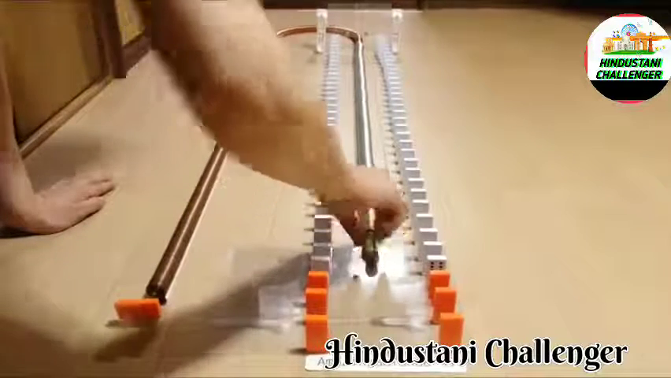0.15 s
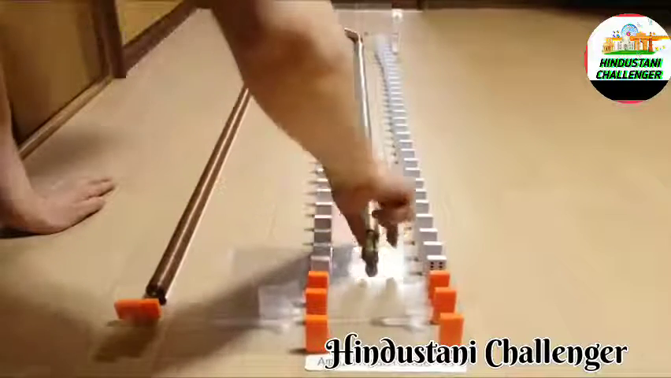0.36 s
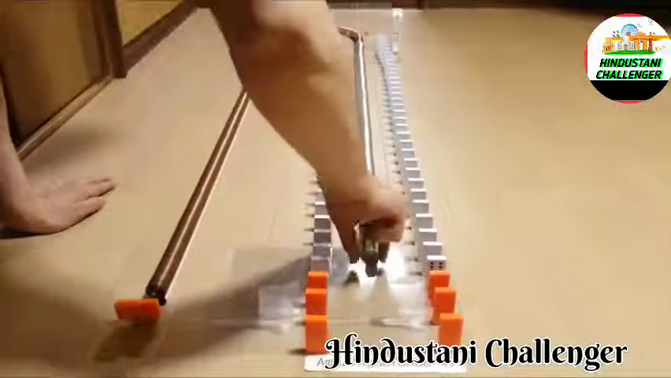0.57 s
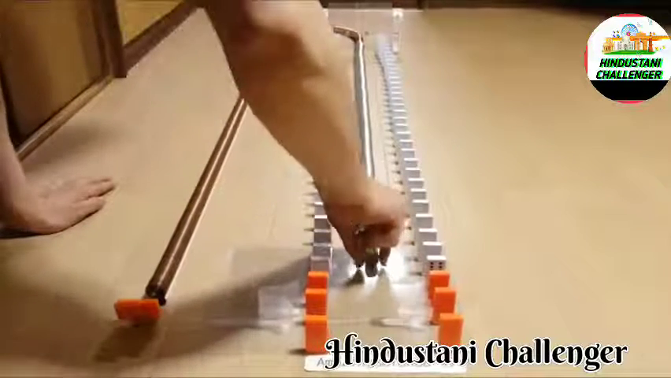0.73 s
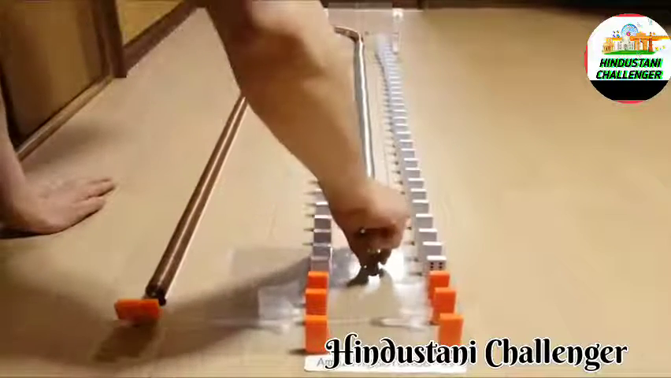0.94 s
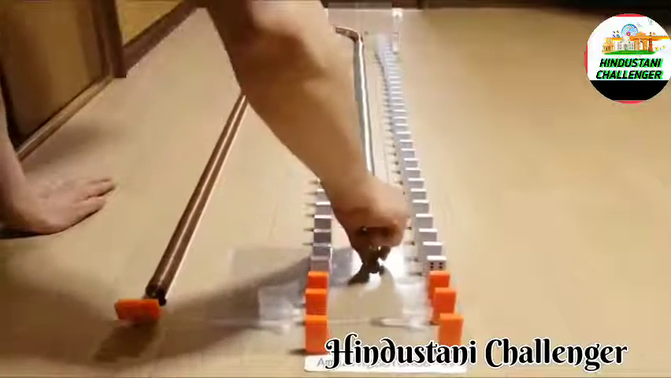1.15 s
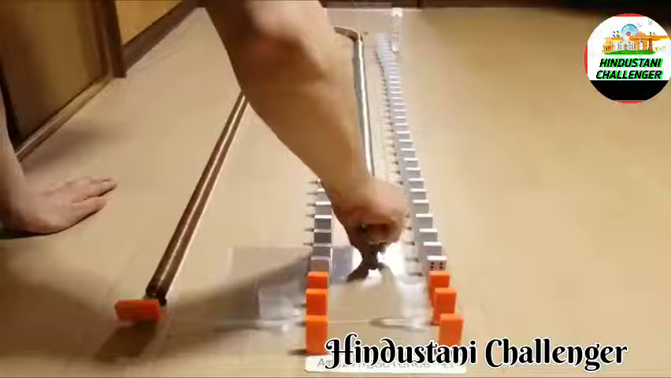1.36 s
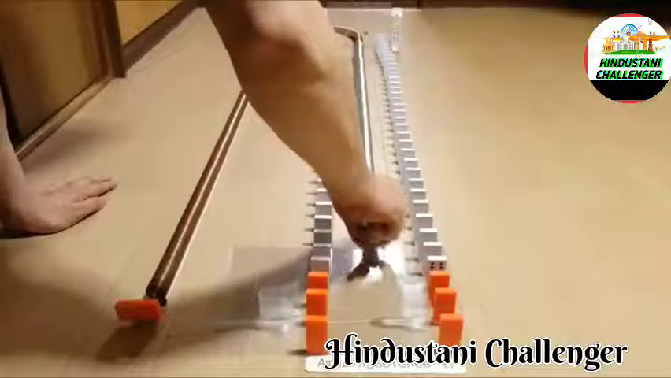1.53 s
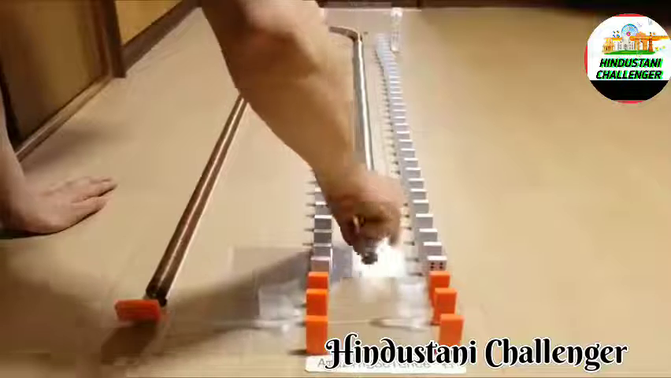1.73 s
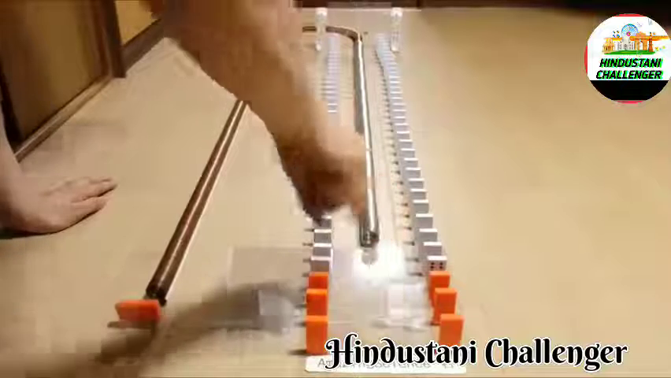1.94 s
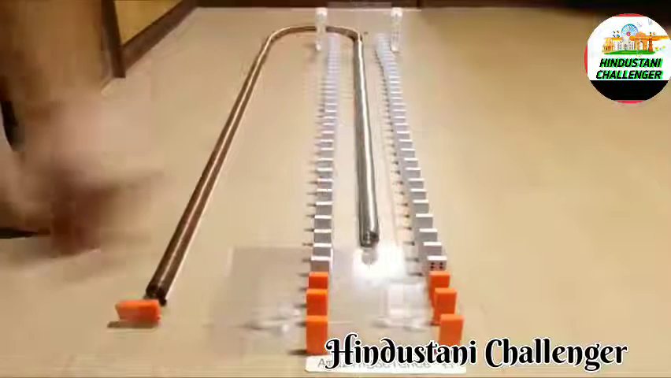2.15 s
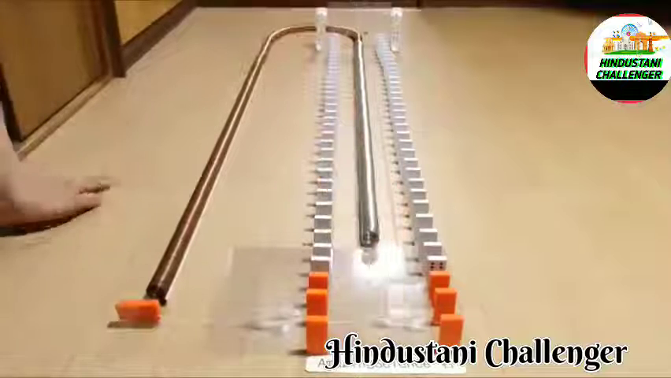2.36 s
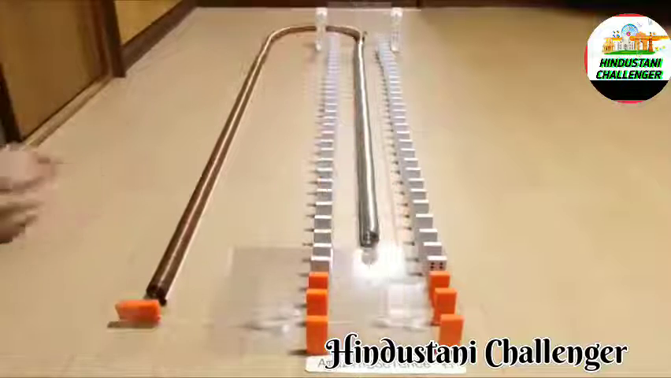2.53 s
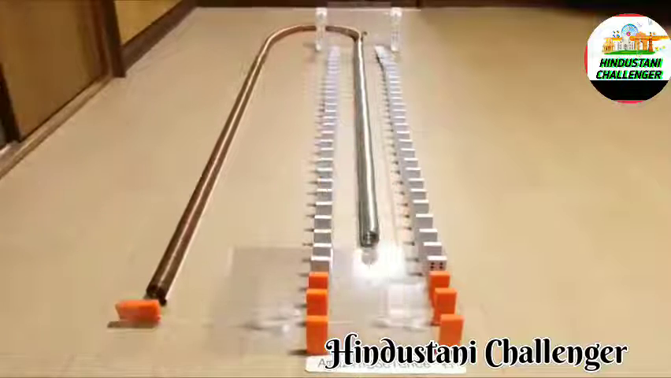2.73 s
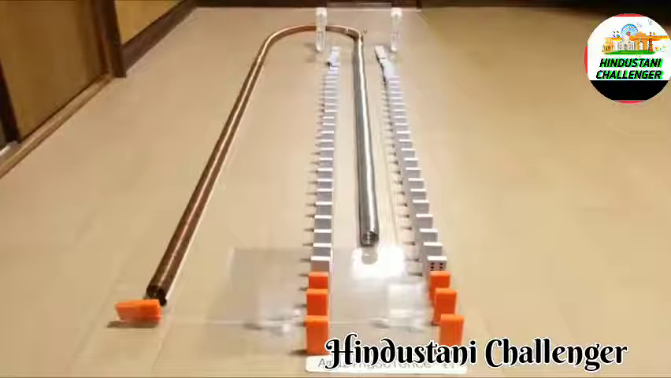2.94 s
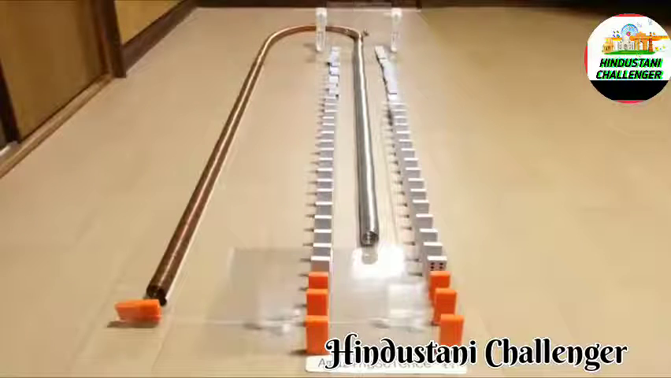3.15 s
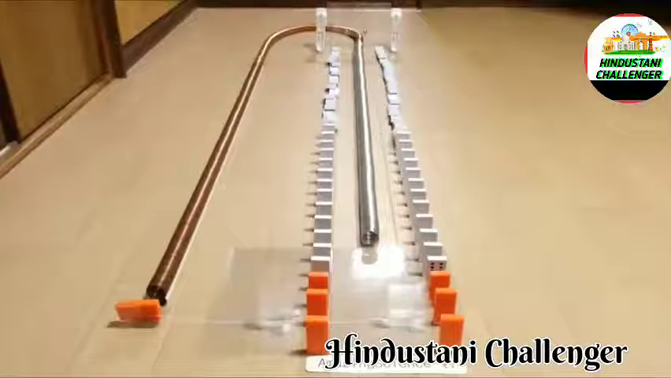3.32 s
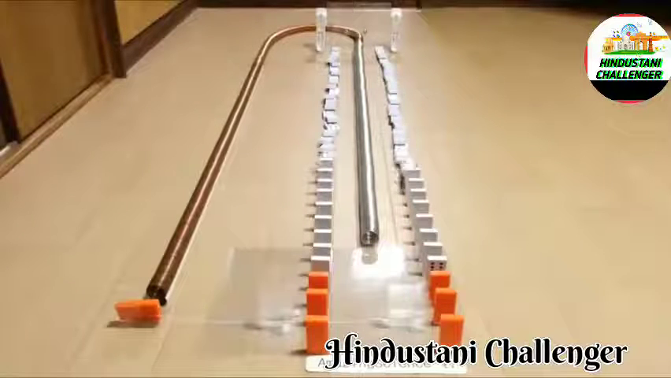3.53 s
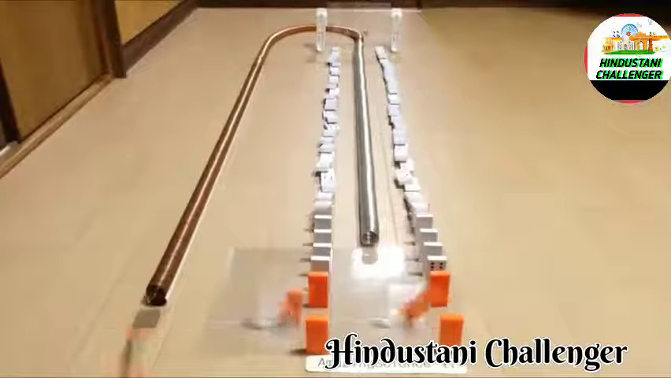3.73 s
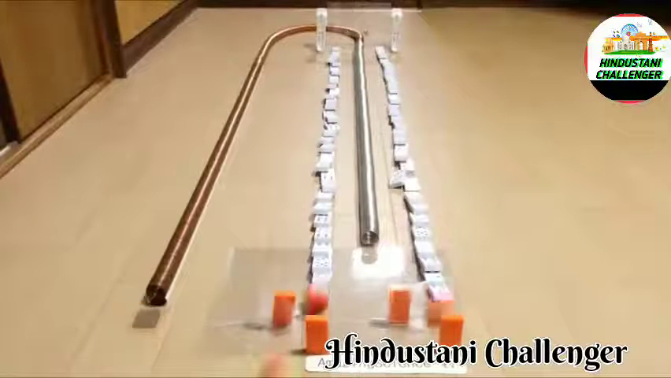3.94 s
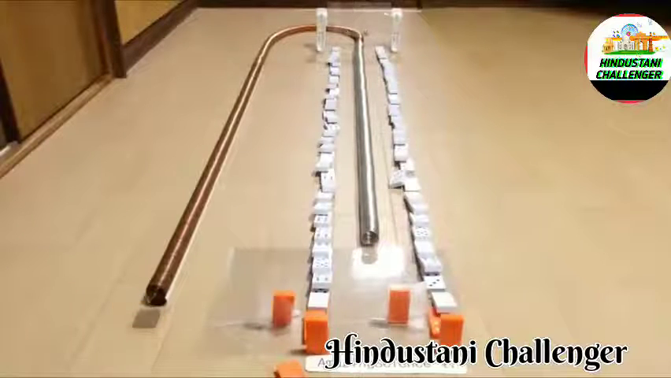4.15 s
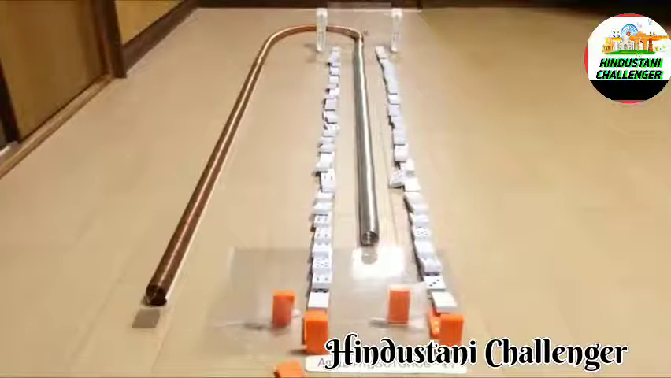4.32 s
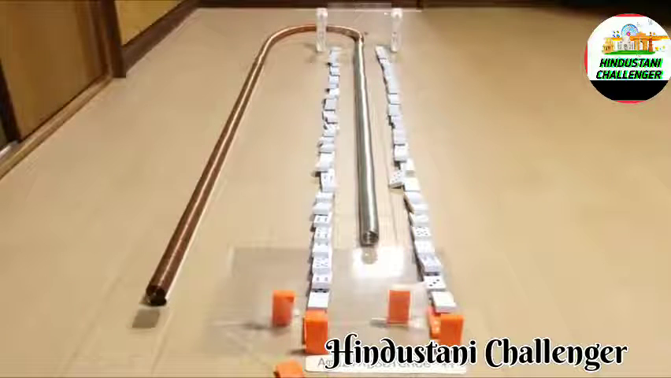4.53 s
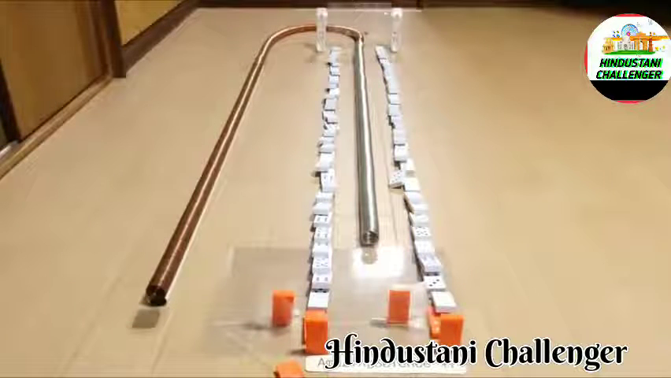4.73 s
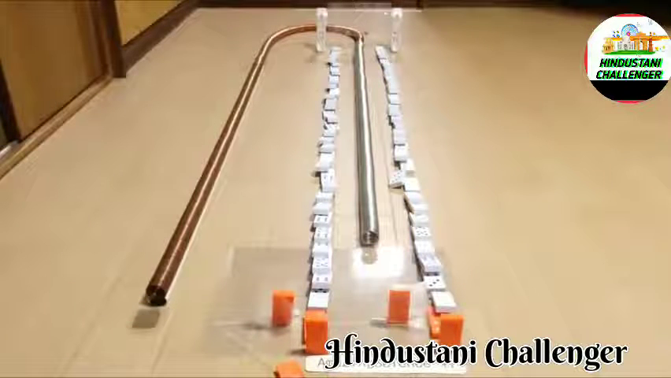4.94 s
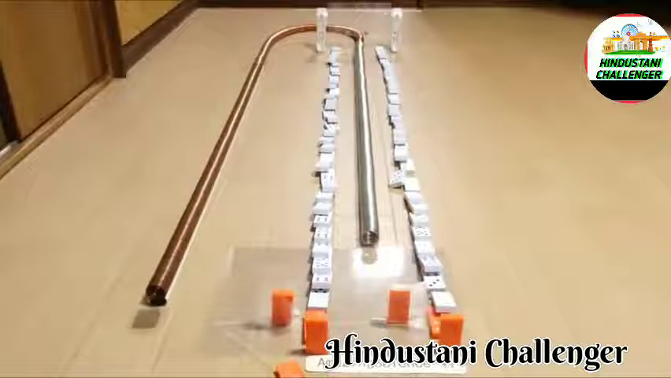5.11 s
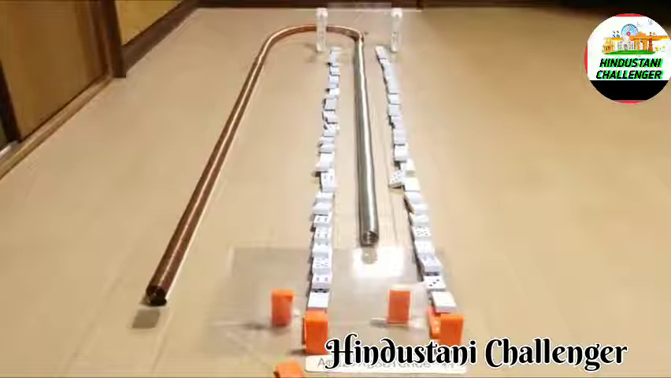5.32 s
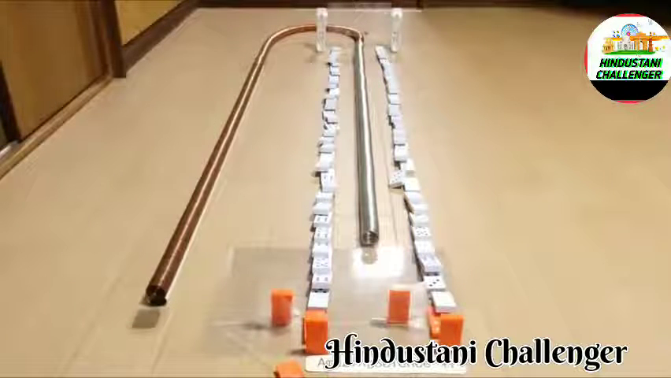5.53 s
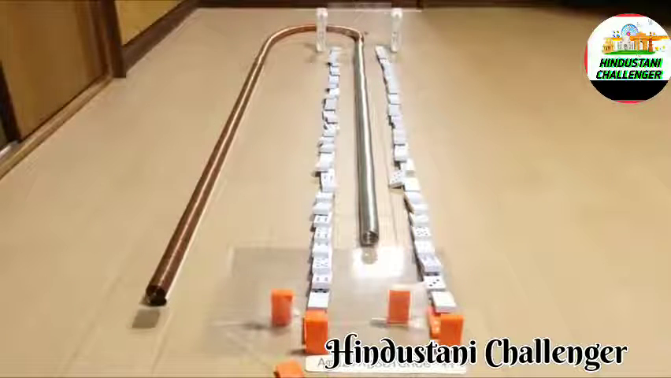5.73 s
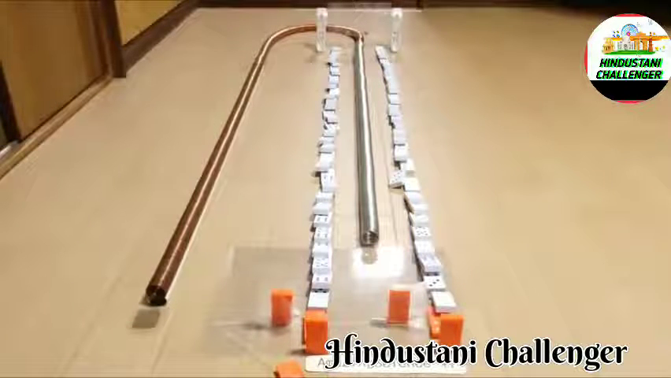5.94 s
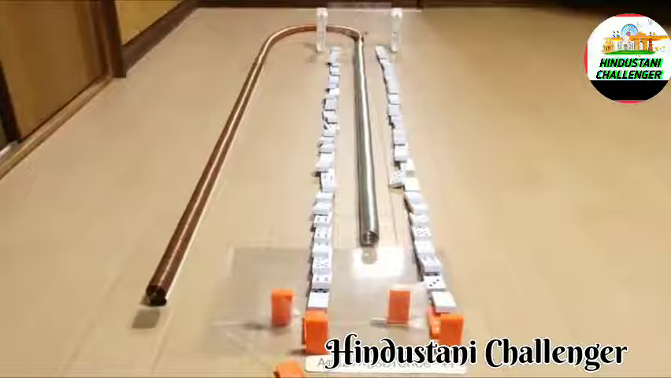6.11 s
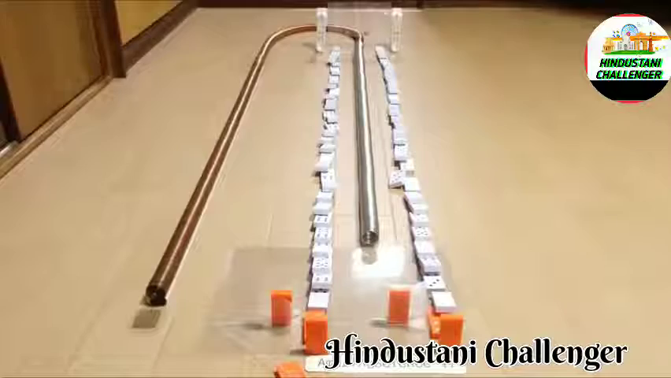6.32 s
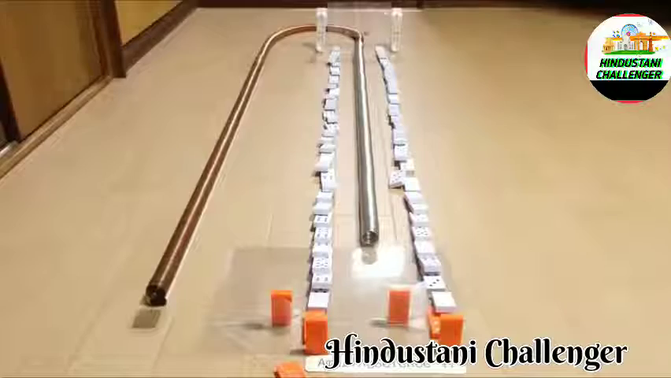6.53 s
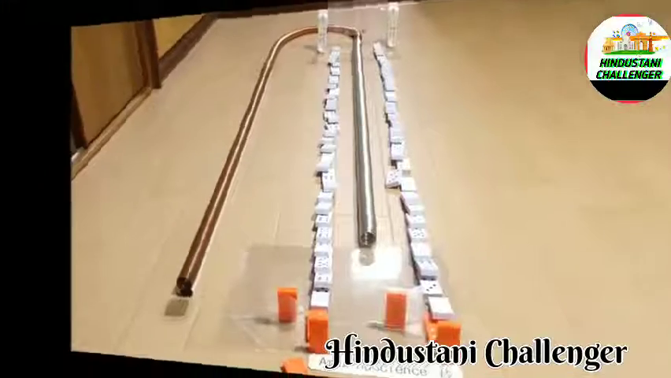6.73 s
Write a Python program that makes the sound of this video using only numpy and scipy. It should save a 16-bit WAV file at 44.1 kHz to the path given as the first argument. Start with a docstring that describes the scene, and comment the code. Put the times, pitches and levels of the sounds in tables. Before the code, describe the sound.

A steel ball rattles through metal pipes, then two rows of dominoes clatter densely on a wooden floor, stop dead, and a plastic block bounces.

```python
"""Two rows of dominoes clatter on a wooden floor: noise cracks, edge snaps and damped sines, then settling.
A steel ball trips them: filtered ticks roll down a steel pipe, rattle round a bend and run on in copper.
Boards drum, a plastic block bounces, and dull blows and soft pushes ring the floor.
Hiss and rumble fill the room; the recorder's gain control ducks under the din, so the hiss vanishes
and creeps back."""
import sys
import numpy as np
from scipy import signal
from scipy.fft import rfft, irfft, next_fast_len
from scipy.io import wavfile
from scipy.ndimage import uniform_filter1d, map_coordinates

SR = 44100
rng = np.random.default_rng(int(sys.argv[2]) if len(sys.argv) > 2 else 0)


def unload_audio(sound):
    """Save the sound as a 16-bit wav file, at the path given as the first command line argument."""
    columns = np.transpose(np.atleast_2d(sound))
    # keep every value between -1 and 1, then stretch to whole-number steps
    steps = np.round(np.clip(columns, -1, 1) * 32767)
    wavfile.write(sys.argv[1], SR, steps.astype(np.int16))


N = 298557
TIME = np.arange(N) / SR
LOUD_DB = 18  # drive of the run, and the most the gain control can cut
# ball: enters steel, strikes bend, calms down, enters copper, drops out
STEEL_S, BEND_S, CALM_S, COPPER_S, EXIT_S = 1.976, 2.423, 2.558, 2.66, 3.68
# dominoes: first row starts, both rows run, rows run out, last tile lies still
FIRST_ROW_S, BOTH_ROWS_S, STOP_S, REST_S = 2.88, 2.932, 4.018, 4.33


def clatter():
    """A stream of small contacts, each a crack and a brief ring, stops dead; then the tiles settle."""
    crack = amp(-23.3) * toppling(BOTH_ROWS_S, swell_db=3, swell_s=.1, release_s=.008)
    crack += amp(-43) * settling(fade_db_per_s=2, release_s=.01)
    ring = amp(-17) * toppling(FIRST_ROW_S, swell_db=14, swell_s=.16, release_s=.011)
    ring += amp(-33.5) * settling(fade_db_per_s=10.5, release_s=.04)
    falling = (TIME > FIRST_ROW_S - .1) & (TIME < REST_S + .1)
    clumps = amp(1.5 * wobble(rate_hz=45))  # contacts clump as one tile after another falls
    blows = falling * clumps * contacts(rate_hz=430, spread_db=3)
    hits = room(cracks(blows), wet_db=-2)
    rings = room(tile_rings(blows), wet_db=-4.5)
    return amp(3) * crack * even(hits, span_s=.12) + amp(-2) * ring * even(rings, span_s=.1)


# loudest domino contacts: (time [s], relative level [dB], ring re level [dB])
HARD_CONTACTS = [(2.799, -9.5, -6.5), (2.8784, -14, 2.5), (2.9317, -9, -14), (2.9956, -5.5, -6),
                 (3.0629, -2.5, -5.5), (3.075, -2, -4), (3.1303, -1, -9.5), (3.2221, -4.5, -3),
                 (3.2854, -4.5, -5.5), (3.3154, -1.5, -7.5), (3.3618, -4, -4.5), (3.3897, 1, -5),
                 (3.4241, -3.5, -4.5), (3.4974, -4.5, -1), (3.5453, -4.5, -7), (3.5887, -1.5, -7.5),
                 (3.6344, -3.5, -8), (3.693, -5, -3), (3.7584, -3.5, -2), (3.7844, -2.5, -2),
                 (3.7919, -2, -2), (3.8327, 0, -8), (3.8887, -5.5, -3), (3.9354, -1, -9.5),
                 (4.0004, -2.5, -4.5), (4.0156, -3.5, -8.5), (4.116, -18.5, -4), (4.2557, -21, -10.5)]
# last tile snaps against the end block: (time [s], relative level [dB])
END_BLOCK_SNAP = [(4.0154, -6.5)]
# snap of the tile edges: (frequency [Hz], relative level [dB])
SNAP_COLOUR = [(3000, -33.5), (7500, -4.5), (11000, -3), (12600, 1.5), (15500, -10.5)]


def clacks():
    """Hard contacts: a crack, a bright snap of the edges and the tile's ring."""
    time_s, db, ring_db = np.transpose(HARD_CONTACTS)
    end_s, end_db = np.transpose(END_BLOCK_SNAP)
    edge_blows = impulses(time_s, amp(db - 25.5)) + impulses(end_s, amp(end_db))
    snaps = coloured(bursts(edge_blows, t60_s=.045), SNAP_COLOUR)
    hits = cracks(impulses(time_s, amp(db)))
    rings = tile_rings(impulses(time_s, amp(db + ring_db)))
    body = room(amp(-13.5) * hits + amp(-2) * rings, wet_db=-9.5)
    return body + amp(-9.5) * room(snaps, wet_db=.5)


def toppling(start_s, swell_db, swell_s, release_s):
    """The rows gather speed, run steadily and stop dead."""
    return envelope(start_s, STOP_S, swell_db, swell_s, release_s=release_s)


def settling(fade_db_per_s, release_s):
    """The fallen tiles slide and shift until they lie still."""
    return envelope(STOP_S, REST_S, fade_db_per_s=fade_db_per_s, release_s=release_s)


# colour of a tile contact: (frequency [Hz], relative level [dB])
CRACK_COLOUR = [(500, -14.5), (1200, -8.5), (1600, -9), (2200, -1.5), (3000, -3.5), (4200, 3), (5500, 4),
                (6400, -5), (7400, -2.5), (9300, -9), (10300, -13), (12500, -9.5), (15000, -28.5)]


def cracks(blows, ping_db=-3, count=8):
    """A contact is a puff of noise and a cluster of brief pings at random pitches."""
    at = np.repeat(np.flatnonzero(blows), count)
    ping_hz = rng.uniform(900, 13000, len(at))
    pings = ringing(at, blows[at], ping_hz, t60_s=.017, attack_s=.0001, size=640)
    puffs = bursts(blows, t60_s=.011)
    return coloured(amp(-1.5) * puffs + amp(ping_db) * pings / np.sqrt(count), CRACK_COLOUR)


# tile modes, before row pitch and detuning: (frequency [Hz], relative level [dB], t60 [s])
TILE_MODES = [(4867, -0.5, 0.06), (6960, -12.5, 0.035), (8925, -13.5, 0.029), (10940, -21, 0.031)]
# mean ring pitch, decides which row is likelier struck: (time [s], frequency [Hz])
LEADING_ROW_PITCH = [(2.8, 4890), (3.31, 4884), (3.37, 5103), (3.66, 4900), (3.79, 5060), (4.3, 5170)]
ROW_PITCH_RATIO = 1.053  # second row over first


def tile_rings(blows, detune_ratio=.008, tile_rate_hz=22):
    """Each tile has its own pitch and is struck several times; the rows differ a little in pitch."""
    at = np.flatnonzero(blows)
    chance = rng.standard_normal((len(at), 2))
    split_hz = TILE_MODES[0][0] * (1 + ROW_PITCH_RATIO) / 2
    lead_hz = np.interp(TIME[at], *np.transpose(LEADING_ROW_PITCH))
    row = (lead_hz + 110 * chance[:, 0] > split_hz).astype(int)
    tile = (tile_rate_hz * TIME[at] + .5 * chance[:, 1]).astype(int)
    sound = np.zeros((2, N))
    for hz, db, t60_s in TILE_MODES:
        own = rng.standard_normal((tile.max() + 1, 2))[tile, row]
        tile_hz = hz * ROW_PITCH_RATIO ** row * (1 + detune_ratio * own)
        sound += ringing(at, amp(db) * blows[at], tile_hz, t60_s, attack_s=.0003, size=2048)
    return sound


# knocks on pipe mouth, wall and bend: (time [s], relative level [dB])
PIPE_KNOCKS = [(0.227, -43.5), (2.042, -9.5), (2.117, -5), (2.363, -9), (2.423, -1.5)]
# contact colours, rattle / steel / copper: (frequency [Hz], relative level [dB])
RATTLE_COLOUR = [(530, -51), (900, -20), (1330, -25), (1590, -22), (2170, -12.5), (3220, -13), (4550, -3.5),
                 (7320, 0.5), (10800, -7.5), (12700, -16.5), (13900, -12.5), (15500, -28)]
STEEL_ROLL_COLOUR = [(530, -54.5), (900, -28.5), (1610, -24), (2660, -18.5), (3500, -13.5), (7500, -3.5),
                     (8250, -9.5), (12100, -17.5), (14400, -15), (15500, -28.5)]
COPPER_ROLL_COLOUR = [(530, -41.5), (900, -16), (2480, -8), (3420, -3), (6350, -6.5), (9180, -5),
                      (11900, -24.5), (14400, -19), (15500, -35)]
# pipe modes: (frequency [Hz], width [Hz], relative level [dB])
STEEL_PIPE_MODES = [(2672, 140, -12.5), (4540, 150, -15.5), (7440, 120, 1.5), (14200, 300, -15.5)]
COPPER_PIPE_MODES = [(3460, 170, -2.5), (7600, 180, -11), (9280, 190, 2.5), (11800, 180, -13.5)]
# steel ring pitch as the ball moves, used relative to its mean: (time [s], frequency [Hz])
STEEL_PITCH_CURVE = [(2.0, 7486), (2.1, 7416), (2.191, 7350), (2.249, 7458), (2.32, 7580), (2.41, 7540)]


def ball():
    """Touches chatter; the ball gathers speed in steel, rattles round the bend, runs on in copper."""
    time_s, db = np.transpose(PIPE_KNOCKS)
    chatter = rebounding(time_s, db, gap_s=.015, loss_db=2)
    touch = coloured(bursts(chatter, t60_s=.042), RATTLE_COLOUR)

    rub = amp(-28.5) * envelope(STEEL_S, BEND_S, swell_db=8.5, swell_s=.058, attack_s=.005)
    ring = amp(-22) * envelope(STEEL_S, BEND_S, swell_db=21.5, swell_s=.089, fade_db_per_s=21)
    steel_ring = wavering(pipe_ring(STEEL_PIPE_MODES), STEEL_PITCH_CURVE)
    steel = rub * rolling(STEEL_ROLL_COLOUR) + ring * steel_ring

    rattle = amp(-15.5) * envelope(BEND_S, CALM_S, swell_db=1.5, attack_s=.001, release_s=.075)
    bend = rattle * rolling(RATTLE_COLOUR)

    rub = amp(-30.5) * envelope(COPPER_S, EXIT_S, fade_db_per_s=7, attack_s=.02)
    ring = amp(-23) * envelope(COPPER_S, EXIT_S, swell_db=17.5, swell_s=.11, fade_db_per_s=25,
                               attack_s=.02)
    copper = rub * rolling(COPPER_ROLL_COLOUR) + ring * pipe_ring(COPPER_PIPE_MODES)
    return room(touch, wet_db=-2.5) + amp(LOUD_DB) * (steel + bend + copper)


def rolling(colour, rate_hz=900, spread_db=2):
    """The ball ticks over the rough wall of the pipe."""
    ticks = bursts(contacts(rate_hz, spread_db), t60_s=.0058)
    return even(room(coloured(ticks, colour), wet_db=.5), span_s=.013)


def pipe_ring(modes):
    """Ticks excite the pipe's resonances, summed with alternating sign."""
    ticks = bursts(contacts(rate_hz=970, spread_db=1.5), t60_s=.005)

    def response(f):
        """Sum of second-order band-pass resonances."""
        total = 0
        for k, (hz, width_hz, db) in enumerate(modes):
            damping = 1j * f * width_hz
            total = total + (-1) ** k * amp(db) * damping / (hz * hz - f * f + damping)
        return total

    return even(filtered(ticks, response), span_s=.1)


def wavering(x, rows):
    """Bend the pitch along a curve about its mean, by resampling."""
    time_s, hz = np.transpose(rows)
    clock = np.cumsum(np.interp(TIME, time_s, hz) / np.mean(hz))
    return np.array([map_coordinates(channel, [clock]) for channel in x])


# plastic block lands and bounces: (time [s], relative level [dB])
BLOCK_BOUNCES = [(4.3351, -9), (4.343, -21), (4.3539, -15.5), (4.368, -21.5), (4.3807, -19.5)]
# colour of its click: (frequency [Hz], relative level [dB])
PLASTIC_COLOUR = [(500, -21), (1100, -9.5), (2000, 0), (3500, -1), (6500, 0), (10000, -7), (13000, -10.5),
                  (15500, -18.5)]


def block():
    """Hollow plastic clicks without a ring; the room answers strongly."""
    time_s, db = np.transpose(BLOCK_BOUNCES)
    clicks = coloured(bursts(impulses(time_s, amp(db)), t60_s=.007), PLASTIC_COLOUR)
    return amp(-9.5) * room(clicks, wet_db=1.5)


# colours of drumming boards and deep shudder: (frequency [Hz], relative level [dB])
BOARD_COLOUR = [(59, -34.5), (100, -8), (130, 4.5), (200, -12), (274, -2.5), (376, -5.5), (422, -2),
                (620, -5), (663, -1.5), (769, -9.5), (881, -8.5), (1120, -22), (1500, -29.5), (1950, -50.5),
                (3300, -120)]
JOIST_COLOUR = [(22, -43), (35, -14), (50, 1), (75, -5), (100, -6), (135, 0), (170, -3), (260, -35)]


def floorboards():
    """Boards drum and joists shudder under the rolling ball and the falling tiles."""
    steel = envelope(STEEL_S, COPPER_S, swell_db=19.5, swell_s=.9)
    copper = envelope(COPPER_S, EXIT_S, fade_db_per_s=2, attack_s=.006, release_s=.066)
    tiles = envelope(FIRST_ROW_S, STOP_S, swell_db=10, swell_s=.11, fade_db_per_s=1, release_s=.005)
    rest = settling(fade_db_per_s=16, release_s=.098)
    # board levels add in power
    ball_power = (amp(-31.5) * steel) ** 2 + (amp(-28.5) * copper) ** 2
    tile_power = (amp(-23) * tiles) ** 2 + (amp(-44) * rest) ** 2
    boards = np.sqrt(ball_power + tile_power)
    shudder = amp(-30) * steel + amp(-31) * copper + amp(-44) * tiles + amp(-66) * rest
    loaded = (TIME > STEEL_S - .2) & (TIME < REST_S + .3)
    taps = bursts(contacts(rate_hz=260, spread_db=.5), t60_s=.064)
    patter = even(coloured(taps, BOARD_COLOUR), span_s=.05)
    boom = even(floor_rings(loaded * contacts(rate_hz=45, spread_db=2)), span_s=.056)
    drumming = boards * (amp(-2) * patter + amp(-3.5) * boom)
    deep = amp(-1) * shudder * even(coloured(noise(), JOIST_COLOUR))
    return amp(LOUD_DB) * (drumming + deep)


# floor modes, before random detuning: (frequency [Hz], relative level [dB], t60 [s])
FLOOR_MODES = [(126.6, -2.5, .16), (199, -7, 0.13), (282, -0.5, 0.13), (351.7, -4.5, .12),
               (427.7, -2.5, 0.11), (519, -7.5, 0.13), (589, -6, 0.078), (675, -7.5, .1)]


def floor_rings(blows, detune_ratio=.021):
    """Every blow rings the floor's modes at new strengths and slightly new pitches."""
    at = np.flatnonzero(blows)
    sound = np.zeros((2, N))
    for hz, db, t60_s in FLOOR_MODES:
        chance = rng.standard_normal((len(at), 2))
        sizes = blows[at] * amp(db + 4.5 * chance[:, 0])
        mode_hz = hz * (1 + detune_ratio * chance[:, 1])
        sound += ringing(at, sizes, mode_hz, t60_s, attack_s=.002, size=5120)
    return sound


# dull blows on the floor: (time [s], knock level [dB], boom re knock [dB])
FLOOR_BLOWS = [(.438, -44, -1), (1.896, -50, 0), (2.127, -23.5, 2.5), (2.51, -18, 2.5), (2.657, -15, 2),
               (2.705, -13, 3), (3.11, -11, -3), (3.58, -7.5, -3), (3.69, -9, -2), (3.826, -8, -4.5),
               (3.946, -11, -5.5), (4.273, -14.5, -12), (4.378, -15, -12), (4.62, -31.5, -5.5)]
# soft pushes, a leaning body or the ball: (time [s], level [dB])
FLOOR_PUSHES = [(0.389, -39.5), (1.895, -40.5), (2.505, -15), (2.665, -7.5), (3.651, -8)]
# woody knock of a blow: (frequency [Hz], relative level [dB])
KNOCK_COLOUR = [(100, -17), (190, -5), (290, -0.5), (450, -4), (650, -10), (900, -23), (1500, -42),
                (3000, -75)]


def thumps():
    """Dull blows knock, ring the floor and rebound; a soft push gives only a damped 72 Hz sine."""
    time_s, db, boom_db = np.transpose(FLOOR_BLOWS)
    gap_s, loss_db = .018, 6
    knocks = coloured(bursts(rebounding(time_s, db, gap_s, loss_db), t60_s=.04), KNOCK_COLOUR)
    booms = floor_rings(rebounding(time_s, db + boom_db, gap_s, loss_db))
    time_s, db = np.transpose(FLOOR_PUSHES)
    at = (time_s * SR).astype(int)
    leans = ringing(at, amp(db), np.full(len(at), 72.), t60_s=.37, attack_s=.005, size=11000)
    return room(knocks + booms, wet_db=-9.5) + leans


# room noise colours, hiss / rumble / fluttering bands: (frequency [Hz], relative level [dB])
HISS_COLOUR = [(530, -36), (900, -10), (1040, -12.5), (1140, -6.5), (1350, -3), (1650, -11.5), (1730, -14),
               (2660, -13), (3420, -5.5), (6580, -6), (7320, -4.5), (12500, -10.5), (14600, -7.5),
               (15500, -16)]
RUMBLE_COLOUR = [(13, -39), (22, -3), (38, -3), (59, 2.5), (97, -5), (134, -4), (209, -14.5), (270, -16),
                 (429, -21), (495, -23), (619, -17), (1000, -29.5), (1300, -57.5), (2200, -120)]
FLUTTER_COLOUR = [(400, -39), (560, -7), (660, -1.5), (850, -13.5), (1020, -16), (1180, -3), (1360, 2),
                  (1560, -7.5), (1800, -40.5)]


def background():
    """Hiss and low rumble of the room; the hiss flutters in the midrange."""
    flutter = unit(amp(5 * wobble(rate_hz=30)) * coloured(noise(), FLUTTER_COLOUR))
    hiss = unit(coloured(noise(), HISS_COLOUR))
    rumble = unit(coloured(noise(), RUMBLE_COLOUR))
    return amp(-58) * hiss + amp(-55.5) * rumble + amp(-70.5) * flutter


# decay of the walls' answer: (frequency [Hz], t60 [s])
WALL_DECAY = [(150, .3), (1000, .33), (4000, .36), (8000, .33), (14000, .27)]


def room(x, wet_db):
    """Add the walls' answer, a noise tail 5 ms late; each frequency dies at its own speed."""
    hz, t, z = signal.stft(rng.standard_normal((2, SR // 2)), SR, nperseg=256)
    decay = fading(t, along(WALL_DECAY, hz)[:, None])
    tail = signal.istft(z * decay, SR, nperseg=256)[1]
    tail = np.pad(tail / np.linalg.norm(tail[0]), ((0, 0), (int(.005 * SR), 0)))
    return x + amp(wet_db) * signal.fftconvolve(x, tail, axes=1)[:, :N]


def stereo(pair, width):
    """Mid and side to left and right; width sets the side gain by frequency."""
    side = filtered(pair[1], lambda hz: amp(along(width, hz)))
    return np.array([pair[0] + side, pair[0] - side])


def amp(db):
    """Decibels to gain."""
    return 10 ** (np.asarray(db) / 20)


def unit(x):
    """Scale to rms 1."""
    return x / np.sqrt(np.mean(x ** 2) + 1e-20)


def along(points, hz):
    """Read (Hz, value) points on a log axis."""
    f, v = np.transpose(points)
    return np.interp(np.log(hz + 1), np.log(f + 1), v)


def fading(t, t60_s):
    """A decay of 60 dB in t60_s."""
    return np.exp(-np.log(1000) * t / t60_s)


def filtered(x, response):
    """x times a response of frequency."""
    m = next_fast_len(N + SR // 2)
    return irfft(rfft(x, m) * response(np.fft.rfftfreq(m, 1 / SR)), m)[..., :N]


def coloured(x, points, size=8192):
    """A causal filter of unit energy with the given spectrum (minimum phase, by cepstrum)."""
    spectrum = amp(along(points, np.fft.rfftfreq(size, 1 / SR)))
    cep = irfft(np.log(spectrum + 1e-6))
    cep[1:size // 2] *= 2
    cep[size // 2 + 1:] = 0
    kernel = irfft(np.exp(rfft(cep)))
    return signal.oaconvolve(x, kernel[None] / np.linalg.norm(kernel), axes=1)[:, :N]


def noise():
    """Two unrelated white noises, for mid and side."""
    return rng.standard_normal((2, N))


def even(x, span_s=.17):
    """Hold the slow level at rms 1 and keep the single contacts."""
    power = uniform_filter1d(np.mean(x ** 2, 0), int(span_s * SR))
    power = uniform_filter1d(power, int(span_s * SR / 2))
    return x / np.sqrt(np.abs(power) + 1e-4 * np.mean(power))


def contacts(rate_hz, spread_db):
    """Impulses at random moments, of uneven strength."""
    strength = amp(spread_db * np.clip(rng.standard_normal(N), -2, 2))
    return (rng.random(N) < rate_hz / SR) * strength


def impulses(time_s, sizes):
    """Impulses at given moments."""
    return np.bincount(np.round(np.asarray(time_s) * SR).astype(int), sizes, N)[:N]


def rebounding(time_s, db, gap_s, loss_db, count=3):
    """Each blow sounds count times, weaker each time."""
    return sum(impulses(time_s + k * gap_s, amp(db - k * loss_db)) for k in range(count))


def bursts(blows, t60_s):
    """Every impulse becomes its own short burst of noise."""
    power = signal.lfilter([1], [1, -fading(1 / SR, t60_s) ** 2], blows ** 2)
    return np.sqrt(np.abs(power)) * noise()


def ringing(at, sizes, hz, t60_s, attack_s, size):
    """A damped sine from each sample in at, with separate random phases in mid and side."""
    t = np.arange(size, dtype=np.float32) / SR
    shape = fading(t, t60_s) * (1 - np.exp(-t / attack_s))
    swing = np.outer(np.float32(sizes), np.float32(shape))
    phase = np.outer(np.float32(2 * np.pi * hz), t)
    turns = np.float32(2 * np.pi * rng.random((len(at), 2, 1)))
    where = (at[:, None] + np.arange(size)).ravel()
    return np.array([np.bincount(where, (swing * np.sin(phase + turns[:, k])).ravel(), N)[:N]
                     for k in range(2)])


def envelope(start_s, end_s, swell_db=0, swell_s=.075, fade_db_per_s=0, attack_s=.0027, release_s=.025):
    """Set in swell_db low, gather strength, fade steadily and die away after the end."""
    since_s = np.maximum(TIME - start_s, 0)
    before_s = np.maximum(start_s - TIME, 0)
    after_s = np.maximum(TIME - end_s, 0)
    gate = np.exp(-before_s / attack_s - after_s / release_s)
    return gate * amp(-swell_db * np.exp(-since_s / swell_s) - fade_db_per_s * since_s)


def wobble(rate_hz):
    """A smooth random curve, rate_hz knots a second."""
    knots = rng.standard_normal(int(N * rate_hz / SR) + 4)
    return map_coordinates(knots, [TIME * rate_hz])


# stereo width of run and room noise: (frequency [Hz], side gain [dB])
RUN_SIDE_GAIN = [(60, -22.5), (200, -24.5), (700, -29), (1300, -30), (2400, -29.5), (4400, -15), (8100, -6),
                 (13000, -1.5)]
ROOM_SIDE_GAIN = [(60, -9), (110, -12), (200, -7), (380, -5), (700, -8.5), (1290, -13.5), (2380, -3),
                  (4400, 1), (6200, -1.5), (7500, -15), (15000, -16.5)]


def scene():
    """The run in its room, over the background, which leans slightly left."""
    run = amp(LOUD_DB) * (clatter() + clacks() + block()) + ball() + floorboards() + thumps()
    lean = amp([[.25], [-.25]])
    return stereo(run, RUN_SIDE_GAIN) + lean * stereo(background(), ROOM_SIDE_GAIN)


def record(dry, threshold_db=-38, recovery_db_per_s=11, top_hz=15700):
    """Gain control ducks at once, within its range, and recovers steadily; then the band limit."""
    power = uniform_filter1d(np.mean(dry ** 2, 0), int(.024 * SR))
    level_db = 10 * np.log10(np.abs(power) + 1e-12)
    cut_db = np.clip(level_db - threshold_db, 0, LOUD_DB)
    recovered_db = recovery_db_per_s * TIME
    cut_db = np.maximum.accumulate(cut_db + recovered_db) - recovered_db
    return filtered(dry * amp(-cut_db), lambda hz: hz < top_hz)


dry = scene()
out = record(dry)
unload_audio(out)
```